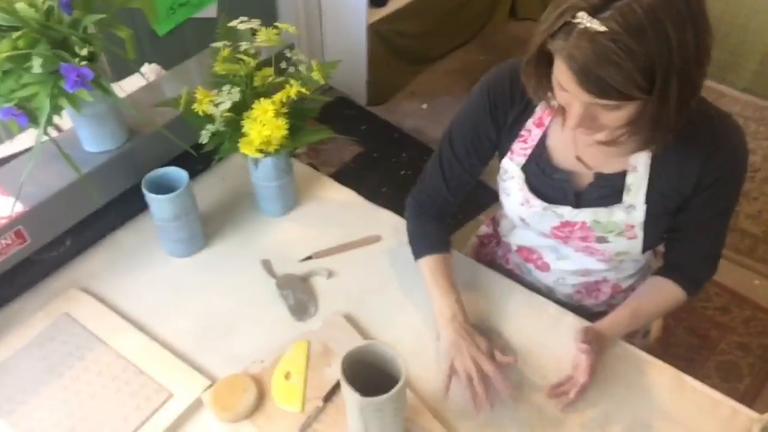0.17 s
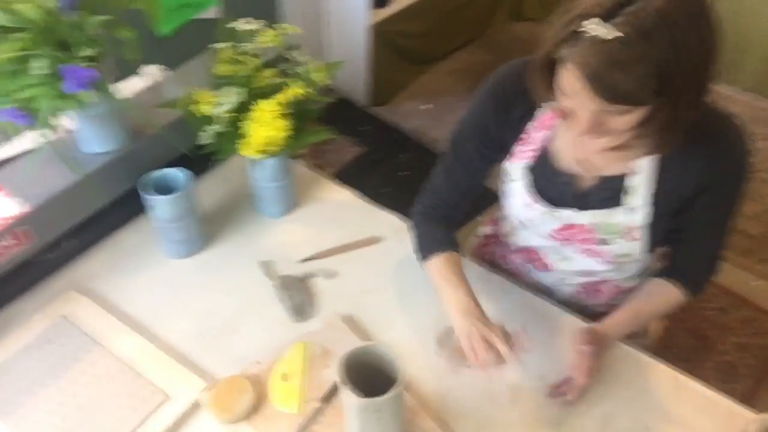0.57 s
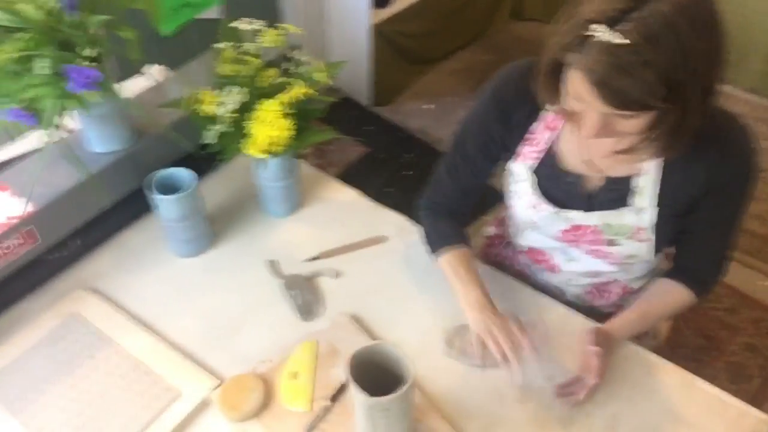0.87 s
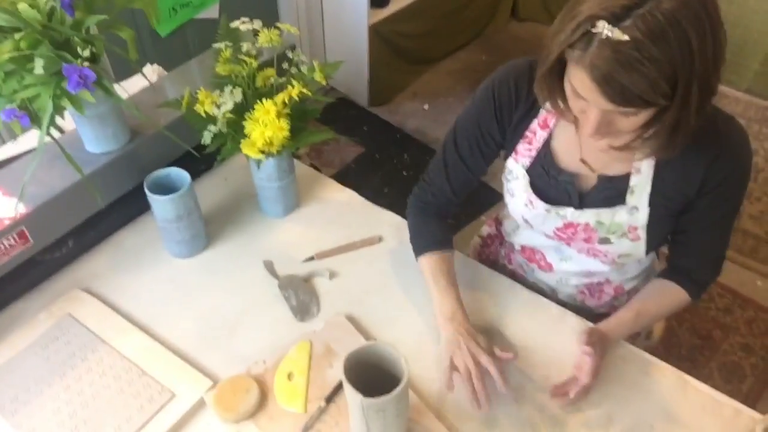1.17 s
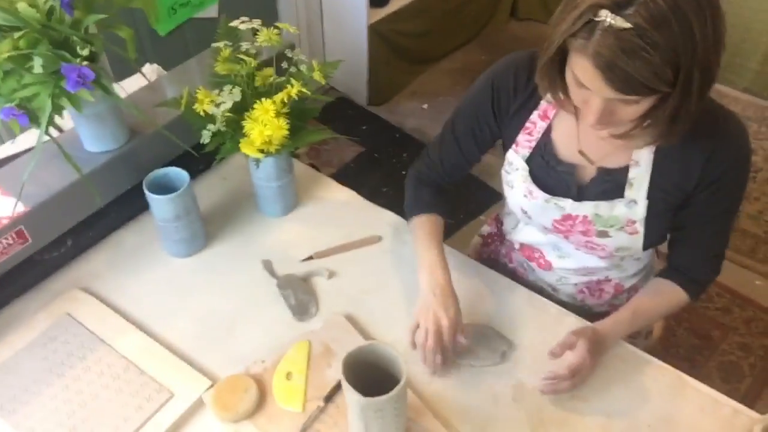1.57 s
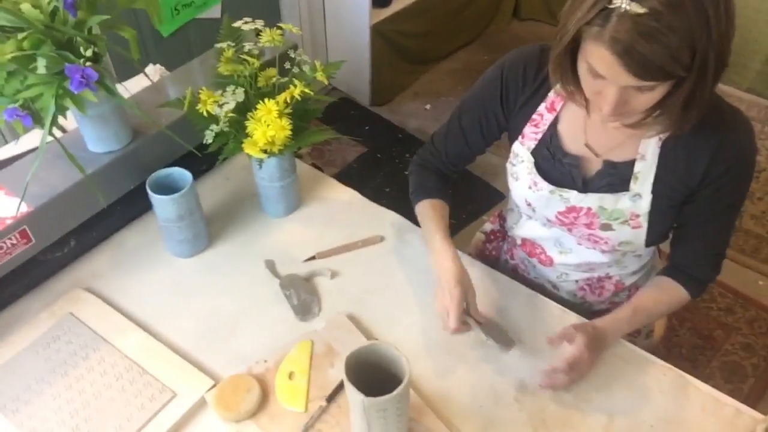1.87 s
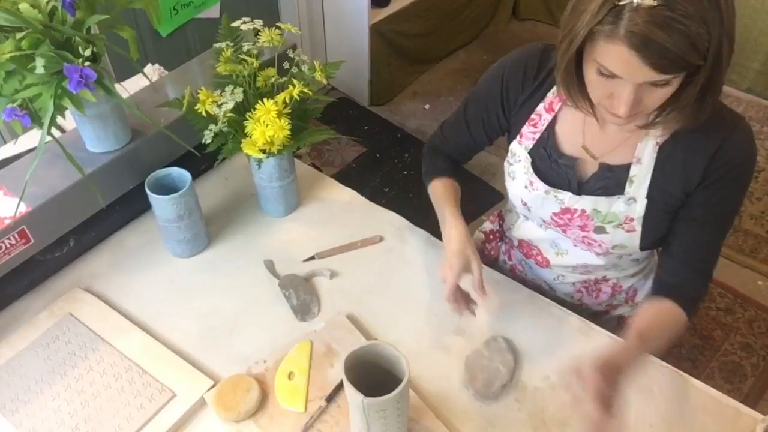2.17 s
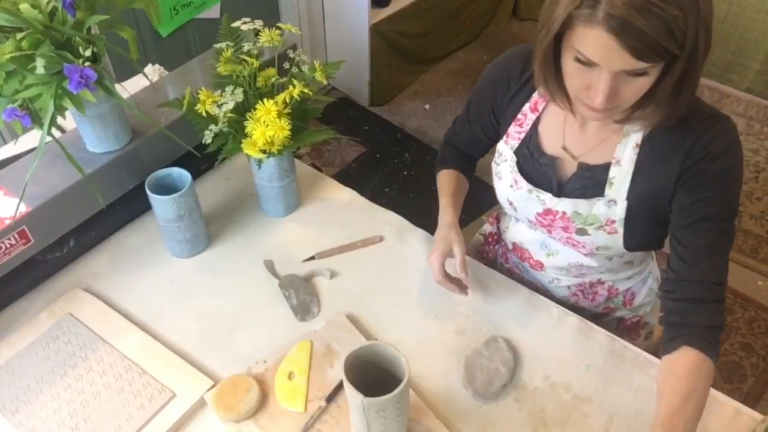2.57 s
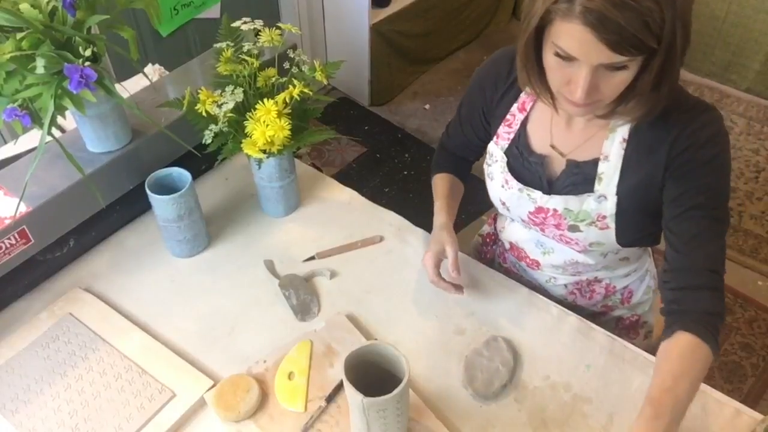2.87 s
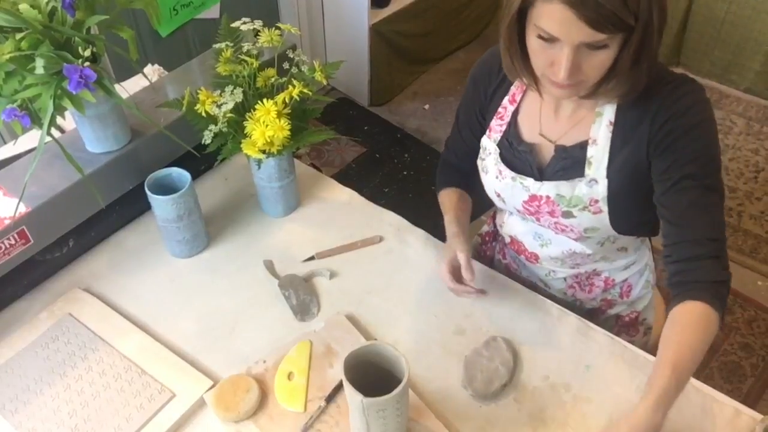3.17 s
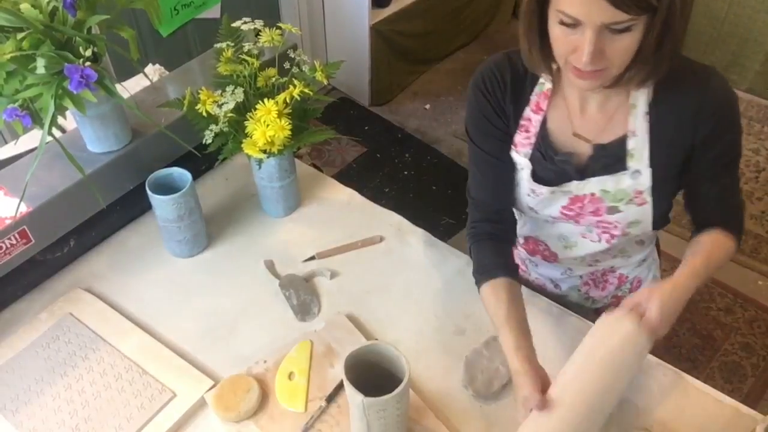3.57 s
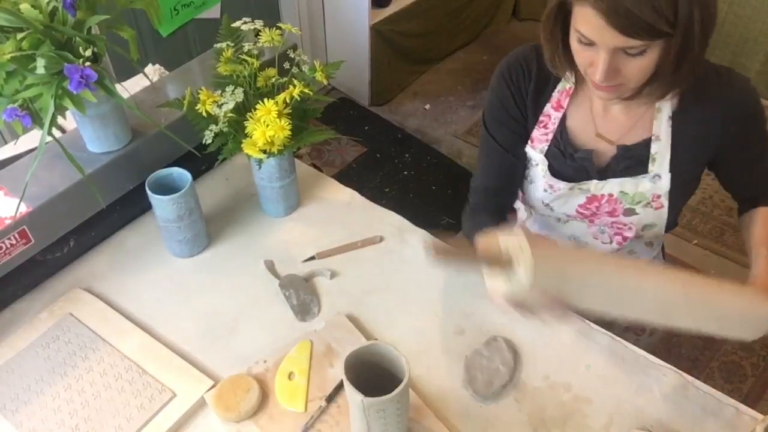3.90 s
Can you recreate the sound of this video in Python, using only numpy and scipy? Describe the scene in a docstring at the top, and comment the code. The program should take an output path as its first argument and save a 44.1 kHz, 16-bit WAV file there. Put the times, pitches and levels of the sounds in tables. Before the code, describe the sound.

Close in a small room, a palm pats wet clay on a canvas-covered table: seven quick thuds about four a second, the middle ones sharpest, the last dull. Grainy peeling rubs follow, then the lump drops with a light double slap. A wooden rolling pin knocks quietly as it is picked up, and palms hiss along it over faint ventilation rumble.

```python
"""Patting clay on a table

A lump of clay is patted flat by hand on a canvas-covered table in a small room: seven quick thuds,
about four a second, bend the table, pop trapped air and make the rolling pin lying there hop.
The clay is peeled up with grainy rubs and dropped back on its edge, then flat; damped wooden modes
knock as the pin is fetched, and palms hiss along it. Filtered noise makes a faint ventilation rumble."""
import sys
import numpy as np
from scipy import signal
from scipy.fft import rfft, irfft
from scipy.io import wavfile

SR = 44100
rng = np.random.default_rng(int(sys.argv[2]) if len(sys.argv) > 2 else 0)


def persist_wave(psi):
    """Save psi, clipped to +-1, as 16-bit WAV."""
    counts = np.round(np.clip(psi, -1, 1) * 32767).astype(np.int16)
    wavfile.write(sys.argv[1], SR, np.atleast_2d(counts).T)


N = 178031
TIME = np.arange(N) / SR
AGE = TIME[:SR]   # one second counted from a contact

# Pats of the palm on the clay: start_s, weight_db, seat_s, slap_db, pop_hz, smack_top_hz
PATS = [(0.0006, -14, 0.0019, -21, 1040, 4000), (0.2517, -14, 0.002, -26.5, 1180, 12300),
        (0.5070, -13, 0.0028, -5.5, 1580, 10300), (0.7556, -14, 0.0025, -2, 1540, 9400),
        (0.9829, -17, 0.0028, -8.5, 990, 14400), (1.2234, -16, 0.0037, -12.5, 1080, 10800),
        (1.4178, -18.5, 0.018, -38.5, 1500, 8500)]
# The lump falling on its edge, then flat: start_s, flex_db, knock_db, smack_db
DROPS = [(2.219, -44.5, -29, -6), (2.2489, -33.5, -17.5, -2)]
# Modes of the table top, damped by its canvas: pitch_hz, level_db, t60_s
TABLE_MODES = [(172, -19.5, 0.043), (216.6, -9.5, 0.015), (254, -0.5, 0.024), (326.5, -14, 0.073),
               (352.2, -19, 0.21), (479, -23, .03), (554, -32.5, 0.072), (677, -14.5, 0.02)]
# Spectrum of the wet smack: frequency_hz, level_db
SMACK_COLOUR = [(150, -29), (400, 3.5), (680, 7.5), (900, 1.5), (1300, 9), (2000, 2), (3000, -4),
                (4200, -1.5), (4900, -9), (6000, -3.5), (8000, -12), (11000, -15), (15000, -9)]
# Knocks of the rolling pin: start_s, ring_db, contact_cutoff_hz, clack_db, table_db
KNOCKS = [(2.6841, -69, 2500, -36.5, -44.5), (2.94, -46, 1196, -42, -61),
          (3.1115, -33.5, 6450, -34.5, -42.5), (3.1160, -37, 5400, -33, -35.5),
          (3.9282, -38.5, 1190, -43, -65)]
# Modes of the rolling pin, damped by the hands: pitch_hz, level_db, t60_s
PIN_MODES = [(506, -13.5, 0.054), (1046, -7.5, 0.1), (1155, 2, 0.026), (1210, 3, 0.13),
             (1370, -12.5, 0.087), (1757, -5, .05), (1930, -6, 0.032), (2420, -5.5, 0.055),
             (2530, -5.5, 0.12), (3070, -8.5, 0.06), (3810, -8, 0.048), (4222, -1, 0.087)]
# Spectrum of the dull clack of wood on the covered table: frequency_hz, level_db
CLACK_COLOUR = [(100, -26.5), (220, -4.5), (320, 2), (520, -4.5), (750, -8.5), (1000, 6), (2000, -0.5),
                (3600, -11), (5000, -16), (7000, -14.5), (10000, -27), (16000, -30.5)]
# Soft fingertip taps: start_s, level_db, pitch_hz
TAPS = [(1.594, -52, 518), (1.76, -47, 545), (1.845, -49.5, 550), (2.594, -45.5, 377), (3.084, -34, 129)]
# Skin peeling off clay and dragging on canvas and wood: start_s, level_db, decay_s, top_hz
DRAGS = [(0.911, -61, 0.084, 7140), (1.114, -60.5, 0.026, 8900), (1.663, -62, 0.0029, 3500),
         (1.693, -68.5, 0.06, 4030), (1.758, -61, 0.0044, 4000), (1.802, -60, 0.013, 2530),
         (3.002, -67, 0.1, 2500), (3.708, -61.5, 0.016, 2520)]
# Spectrum of the drags: frequency_hz, level_db
DRAG_COLOUR = [(400, 8.5), (900, 2), (1800, 2.5), (3200, -2.5), (6000, -5.5), (9000, -9), (16000, -19.5)]
# Palms brushing and sliding along the pin: middle_s, level_db, half_length_s
SLIDES = [(3.513, -66.5, .002), (3.648, -64.5, 0.056), (3.927, -63, 0.13)]
# Spectrum of the slides: frequency_hz, level_db
SLIDE_COLOUR = [(700, -5), (1500, -2), (2600, 1), (4000, 5.5), (7000, 2), (11000, -3.5), (15500, -4)]
# Decay of the room's diffuse tail: frequency_hz, t60_s
ROOM_T60 = [(60, 0.5), (150, 0.36), (300, 0.4), (700, 0.32), (1400, 0.31), (2500, 0.32), (6000, 0.36),
            (15000, 0.25)]
# Spectrum of that tail: frequency_hz, level_db
ROOM_COLOUR = [(40, -5.5), (80, -11), (150, -8.5), (260, 0.5), (450, 1), (700, 4), (1300, -4.5), (2500, -4),
               (6000, -7), (15000, -3.5)]
# Distinct returns from the walls: delay_s, level_db, cutoff_hz
WALLS = [(0.0405, -15, 601), (0.067, -19, 241)]
# Spectrum of the air noise: frequency_hz, level_db
AIR_COLOUR = [(25, -21.5), (55, 8.5), (130, -1), (175, -10.5), (300, -15), (600, -21), (1200, -21),
              (2300, -23), (4500, -28.5), (7000, -32.5), (10000, -39.5), (16000, -41)]

# Pats: each level is that of a slap of 0 dB; FOLLOWS is in dB per dB of slap
POP_DB = -13.5   # follows the slap dB for dB
KNOCK_DB, KNOCK_FOLLOWS = -11, 0.56
SMACK_DB, SMACK_FOLLOWS, SMACK_LOW_HZ = 7.5, 0.68, 360
FINGERS_LAG_S, FINGERS_DB, FINGERS_HZ = 0.009, -15.5, 1850   # fingers land after the palm
# The clay spreads on the canvas after each pat; jolt() scales the level
SQUISH_LAG_S, SQUISH_DECAY_S, SQUISH_TOP_HZ, SQUISH_DB = 0.024, 0.022, 13000, -32.5
BRISK_SEAT_S = 0.0023   # seating time at which the jolt equals the weight
STRIKE_SPREAD_DB = 1.25   # standard deviation of each mode's strength between contacts
# Drops: seating time, edges of the smack, and the limit below which the soft lump wakes the table
DROP_SEAT_S, DROP_LOW_HZ, DROP_TOP_HZ, DROP_SOFT_HZ = 0.0014, 1500, 3150, 438
# Hops of the pin after each pat: jolt() scales both levels; more clack than ring
HOP_LAG_S, HOP_RING_DB, HOP_CLACK_DB, HOP_TOP_HZ = 0.022, -32, -23.5, 1500
AIR_DB, RUMBLE_HZ, RUMBLE_DB = -62, 100.3, -60.5
CUTOFF_HZ = 16000   # top of the recorded band


def pats():
    """Impact: weight bends the table and spreads the clay; the slap knocks, pops air and smacks."""
    out = np.zeros(N)
    for start_s, weight_db, seat_s, slap_db, pop_hz, top_hz in PATS:
        add(out, start_s, table_thud(weight_db, seat_s, KNOCK_DB + KNOCK_FOLLOWS * slap_db))

        palm_pop = cut(air_pop(pop_hz, t60=0.0063), 4200, "low")
        add(out, start_s, from_db(POP_DB + slap_db) * palm_pop)
        finger_pop = cut(air_pop(FINGERS_HZ, t60=0.008), 3000, "low")
        add(out, start_s + FINGERS_LAG_S, from_db(FINGERS_DB + slap_db) * finger_pop)

        smack_gain = from_db(SMACK_DB + SMACK_FOLLOWS * slap_db)
        add(out, start_s - 0.5, smack_gain * wet_smack(SMACK_LOW_HZ, top_hz))   # snap at mid-span

        squish_gain = from_db(SQUISH_DB) * jolt(weight_db, seat_s)
        add(out, start_s + SQUISH_LAG_S, squish_gain * drag(SQUISH_DECAY_S, SQUISH_TOP_HZ))
    return out


def drops():
    """Soft impact: the lump alone lands with a light, dull thud and a thin smack."""
    out = np.zeros(N)
    for start_s, flex_db, knock_db, smack_db in DROPS:
        thud = table_thud(flex_db, DROP_SEAT_S, knock_db)
        add(out, start_s, cut(thud, DROP_SOFT_HZ, "low"))
        add(out, start_s - 0.5, from_db(smack_db) * wet_smack(DROP_LOW_HZ, DROP_TOP_HZ))
    return out


def table_thud(flex_db, seat_s, knock_db):
    """Plate excitation: a blow bends the table top and rings its modes."""
    flex = table_flex(seat_s, rest_hz=62.8, sweep_hz=265.8, sweep_s=0.0044, decay_s=0.026, held_s=0.043)
    knock = cut(strike(TABLE_MODES), 110, "high", order=1)
    return from_db(flex_db) * flex - from_db(knock_db) * knock


def table_flex(rise_s, rest_hz, sweep_hz, sweep_s, decay_s, held_s):
    """Dispersion: short bending waves run faster, so the thud falls in pitch before it is damped."""
    cycles = rest_hz * AGE + sweep_hz * sweep_s * (1 - np.exp(-AGE / sweep_s))
    swell = (1 - np.exp(-AGE / rise_s)) * np.exp(-AGE / decay_s)
    stop = 1 / (1 + (AGE / held_s) ** 10)   # steep damping after held_s
    return -np.sin(2 * np.pi * cycles) * swell * stop


def air_pop(hz, t60):
    """Pressure release: trapped air bursts out as a sudden step that rings for a few cycles."""
    return -np.cos(2 * np.pi * hz * AGE) * from_db(-60 * AGE / t60)


def wet_smack(low_hz, top_hz):
    """Contact bandwidth: softer contacts lose the top of the smack, smaller ones the bottom."""
    full = smack(touch_s=0.00029, close_s=0.005, snap_db=-3.5)
    return cut(cut(full, low_hz, "high", order=1), top_hz, "low")


def smack(touch_s, close_s, snap_db):
    """Adhesive contact: tiny wet contacts crowd around one sharp snap, centred on a one-second span."""
    from_snap = AGE - 0.5
    crowd = np.exp(-np.abs(from_snap) / np.where(from_snap < 0, touch_s, close_s))
    burst = rng.standard_normal(SR) * crowd
    snap = from_db(snap_db) * (np.arange(SR) == SR // 2)
    burst = burst / np.linalg.norm(burst) - snap
    for _ in range(3):   # no pitch stands out: even out the spectrum, keeping the burst short
        spectrum = rfft(burst)
        flat = irfft(spectrum / (np.abs(spectrum) + 1e-12), SR)
        burst = flat * crowd ** (1 / 4)
    burst = burst / np.linalg.norm(burst)
    colour = from_db(at_hz(SMACK_COLOUR, np.fft.rfftfreq(SR, 1 / SR)))
    return irfft(rfft(burst) * colour, SR)


def jolt(weight_db, seat_s):
    """Impulse sharpness: the weight of a pat over the time it takes to seat."""
    return from_db(weight_db) * BRISK_SEAT_S / seat_s


def rolling_pin():
    """Coupled impact: the pin hops after each pat, then knocks on the table as it is fetched."""
    out = np.zeros(N)
    for start_s, weight_db, seat_s, *_ in PATS:
        hop = pin_contact(HOP_RING_DB, HOP_CLACK_DB, HOP_TOP_HZ)
        add(out, start_s + HOP_LAG_S, jolt(weight_db, seat_s) * hop)
    for start_s, ring_db, contact_hz, clack_db, table_db in KNOCKS:
        table = from_db(table_db) * cut(strike(TABLE_MODES), 283, "high")
        add(out, start_s, pin_contact(ring_db, clack_db, contact_hz) + table)
    return out


def pin_contact(ring_db, clack_db, contact_hz):
    """Contact stiffness: hard contacts wake the pin's upper modes, soft ones only the lowest."""
    clack = noise(CLACK_COLOUR, size=SR) * from_db(-60 * AGE / 0.04)
    return cut(from_db(ring_db) * strike(PIN_MODES) + from_db(clack_db) * clack, contact_hz, "low")


def strike(modes):
    """Modal synthesis: all modes of a body, each excited a little differently at every contact."""
    out = 0
    for k, (hz, db, t60) in enumerate(modes):
        varied_db = db + STRIKE_SPREAD_DB * rng.standard_normal()
        out = out + (-1) ** k * from_db(varied_db) * ring(hz, t60)
    return out


def ring(hz, t60):
    """Damped oscillation: a decaying sine whose envelope starts at 1."""
    return np.sin(2 * np.pi * hz * AGE) * from_db(-60 * AGE / t60)


def hands():
    """Touch and friction: fingertip taps, short grainy drags and the dry hiss of palms on wood."""
    out = np.zeros(N)
    for start_s, level_db, pitch_hz in TAPS:
        soft_onset = 1 - np.exp(-AGE / 0.0012)
        add(out, start_s, from_db(level_db) * ring(pitch_hz, t60=0.019) * soft_onset)
    for start_s, level_db, decay_s, top_hz in DRAGS:
        add(out, start_s, from_db(level_db) * drag(decay_s, top_hz))
    speed = 0   # the hiss swells and fades with the palms' speed
    for middle_s, level_db, half_s in SLIDES:
        speed = speed + from_db(level_db) * np.exp(-((TIME - middle_s) / half_s) ** 2)
    return out + speed * noise(SLIDE_COLOUR, size=N)


def drag(decay_s, top_hz):
    """Granular friction: a grainy rub that lets go suddenly, then eases."""
    stroke = np.sqrt(2 * AGE / decay_s) * np.exp(0.5 - AGE / decay_s)   # peaks at 1
    grain_times = AGE[::64]
    grain_db = 3.5 * rng.standard_normal(len(grain_times))
    grain = np.interp(AGE, grain_times, from_db(grain_db))
    return stroke * grain * cut(noise(DRAG_COLOUR, size=SR), top_hz, "low", order=1)


def in_room(x, near_db, near_t60, tail_db):
    """Superposition: direct sound, scatter from things on the table, dull wall returns and the tail."""
    scatter = cut(rng.standard_normal(SR), 220, "high")
    scatter = scatter * (1 - np.exp(-AGE / 0.0019)) * from_db(-60 * AGE / near_t60)
    near = from_db(near_db) * scatter / np.linalg.norm(scatter)
    response = near + from_db(tail_db) * room_tail(build_s=0.0056)
    out = x + signal.fftconvolve(x, response)[:N]
    for delay_s, level_db, top_hz in WALLS:
        add(out, delay_s, from_db(level_db) * cut(x, top_hz, "low", order=1))
    return out


def room_tail(build_s):
    """Diffuse reverberation: third-octave bands of noise, each dying at its own pace."""
    hz = np.fft.rfftfreq(SR, 1 / SR)
    white = rfft(rng.standard_normal(SR))
    edges = np.geomspace(30, 17000, 28)
    out = 0
    for low, high in zip(edges, edges[1:]):
        centre = np.sqrt(low * high)
        band = irfft(white * ((hz >= low) & (hz < high)), SR)
        band = band * from_db(-60 * AGE / at_hz(ROOM_T60, centre))
        band = band * (1 - np.exp(-AGE / build_s))
        to_bandwidth = np.sqrt(2 * (high - low) / SR / np.sum(band ** 2))   # energy set by bandwidth
        out = out + band * to_bandwidth * from_db(at_hz(ROOM_COLOUR, centre))
    return out


def room_tone(width_hz):
    """Stationary noise: faint air noise and a wavering low rumble of ventilation, a narrow noise band."""
    edges = [RUMBLE_HZ - width_hz, RUMBLE_HZ + width_hz]
    band = signal.butter(2, edges, "band", fs=SR, output="sos")
    rumble = signal.sosfilt(band, rng.standard_normal(N + SR))[SR:]   # drop the filter's start-up
    return from_db(AIR_DB) * noise(AIR_COLOUR, size=N) + from_db(RUMBLE_DB) * rumble / rumble.std()


def noise(colour, size):
    """Spectral shaping: noise of a given spectrum, rms 1."""
    gain = from_db(at_hz(colour, np.fft.rfftfreq(size, 1 / SR)))
    x = irfft(rfft(rng.standard_normal(size)) * gain, size)
    return x / x.std()


def cut(x, hz, kind, order=2):
    """Linear filtering: a causal low- or high-pass."""
    sos = signal.butter(order, min(hz, SR / 2 - 100), kind, fs=SR, output="sos")
    return signal.sosfilt(sos, x + 1e-18)   # the tiny offset avoids denormal numbers


def at_hz(points, hz):
    """Logarithmic pitch scale: read a table on a log-frequency axis."""
    f, value = np.transpose(points)
    return np.interp(np.log(np.maximum(hz, 1)), np.log(f), value)


def from_db(db):
    """Logarithmic level scale: decibels to amplitude gain."""
    return 10 ** (np.asarray(db) / 20)


def add(track, start_s, sound):
    """Superposition: mix a sound into a track at a time, trimmed to the track."""
    at = int(round(start_s * SR))
    first, last = max(at, 0), min(at + len(sound), N)
    track[first:last] += sound[first - at:last - at]


def scene():
    """Direct-to-reverberant balance: clay and hands are close; the pin, farther off, has more room."""
    clay = in_room(pats() + drops(), near_db=-10, near_t60=0.1, tail_db=-1.0)
    touches = in_room(hands(), near_db=-5, near_t60=0.051, tail_db=-14)
    pin = in_room(rolling_pin(), near_db=-5.5, near_t60=0.049, tail_db=-0.5)
    return (clay + touches + pin + room_tone(width_hz=7.7))[None]


def record(dry):
    """Band limiting: the small microphone loses the deepest bass; the top is cut."""
    thin = cut(dry, 20, "high")
    top_cut = signal.ellip(10, 0.1, 90, CUTOFF_HZ, fs=SR, output="sos")
    return signal.sosfilt(top_cut, thin)


dry = scene()
out = record(dry)
persist_wave(out)
```